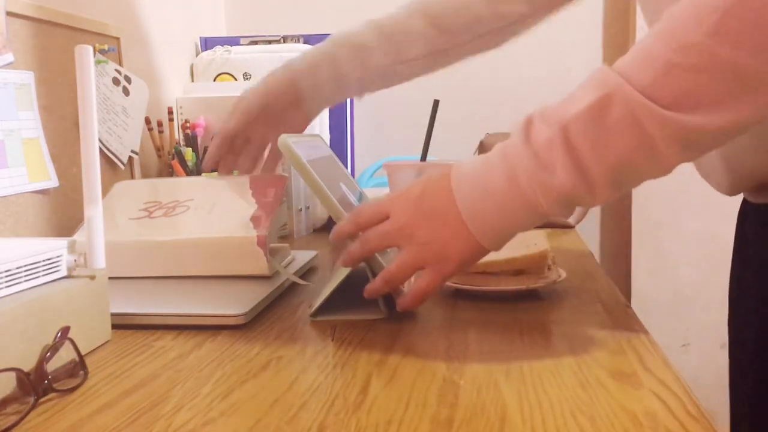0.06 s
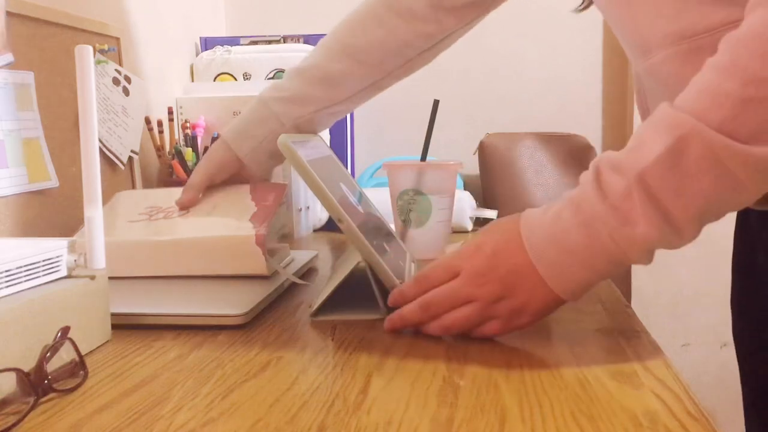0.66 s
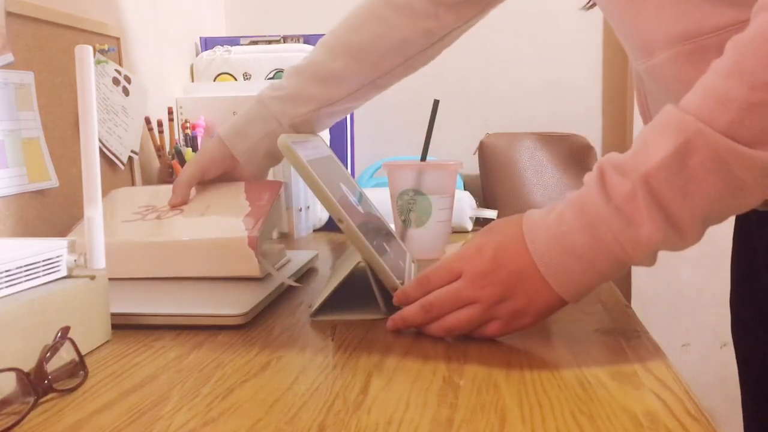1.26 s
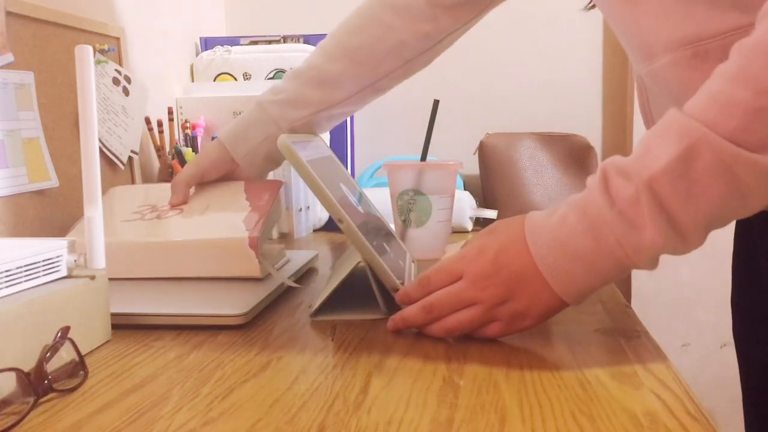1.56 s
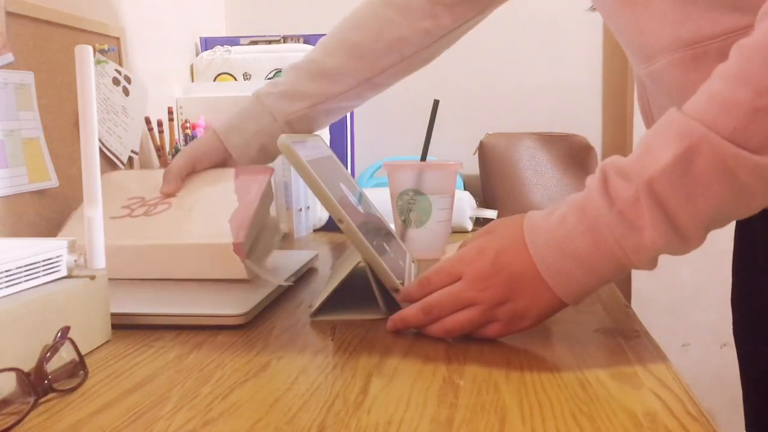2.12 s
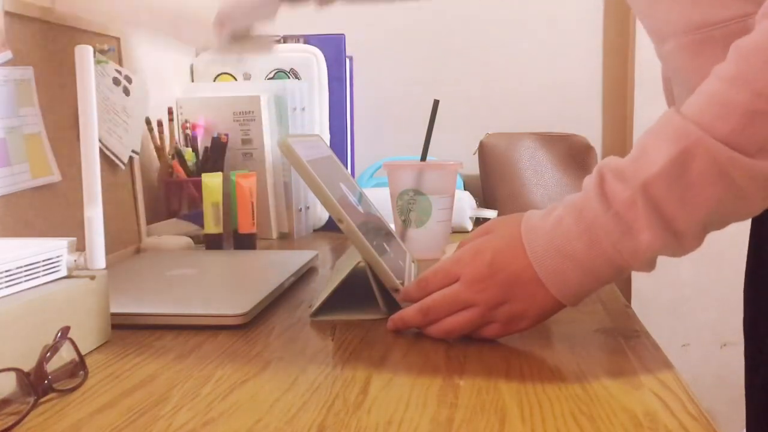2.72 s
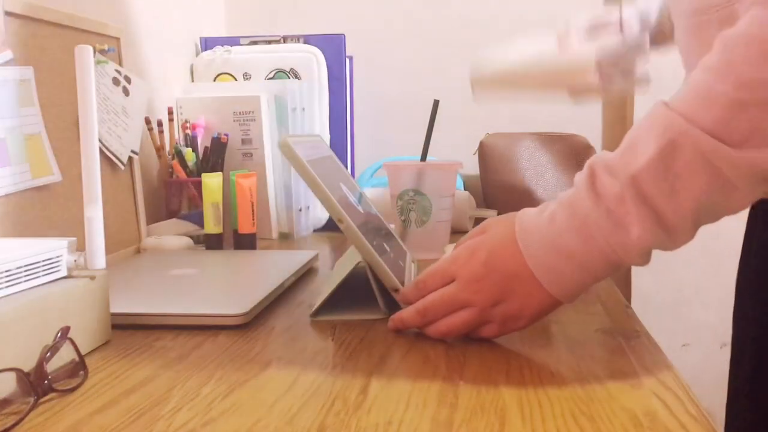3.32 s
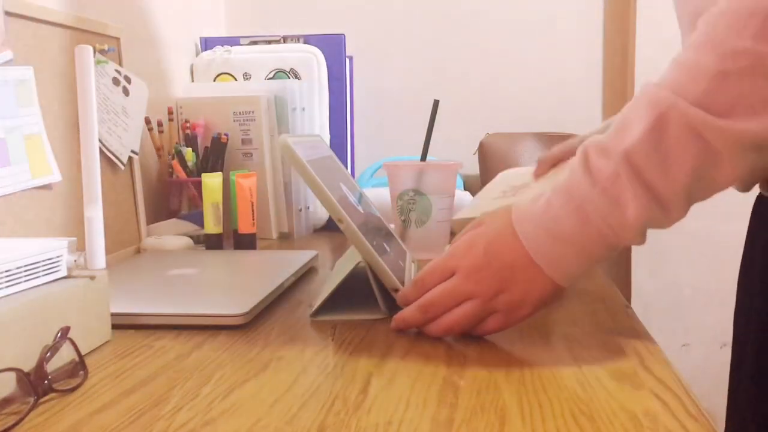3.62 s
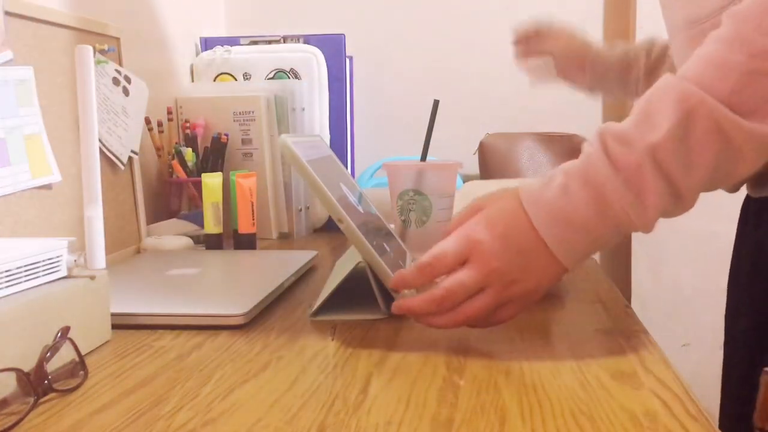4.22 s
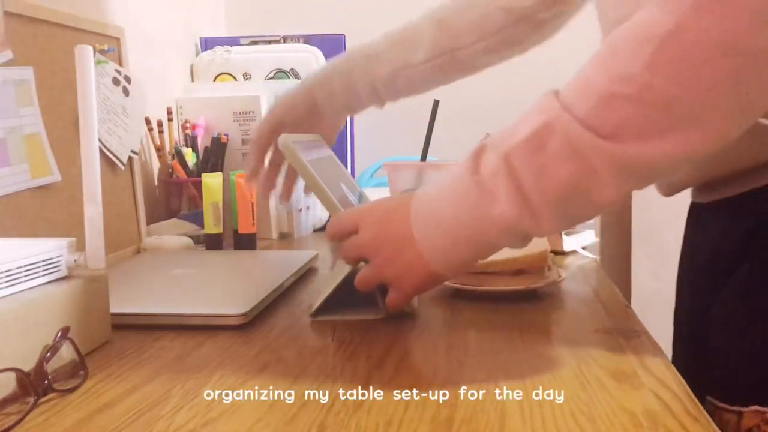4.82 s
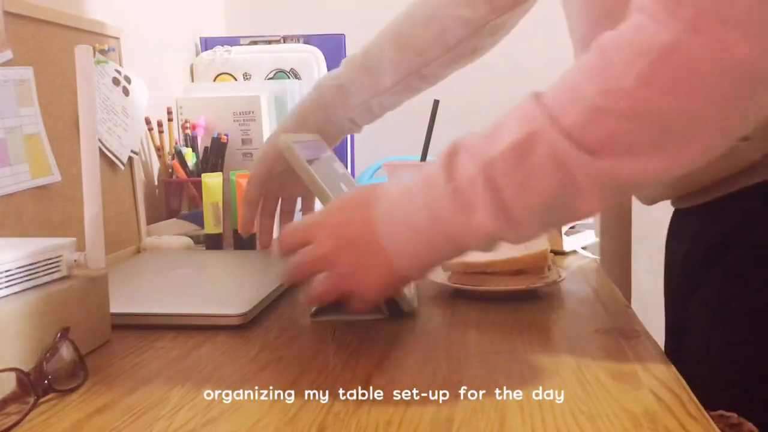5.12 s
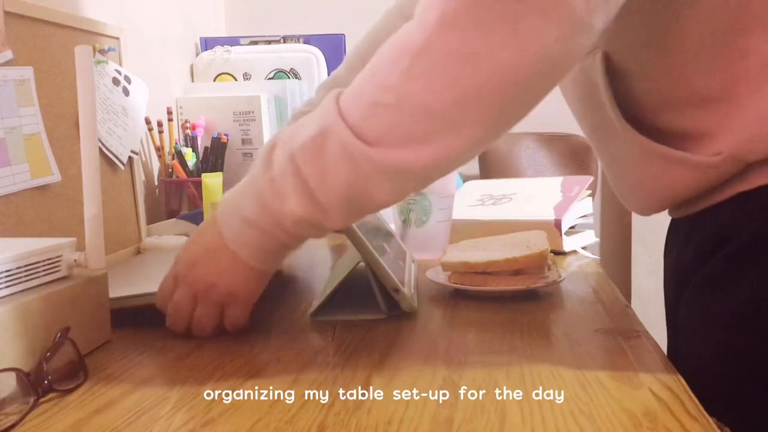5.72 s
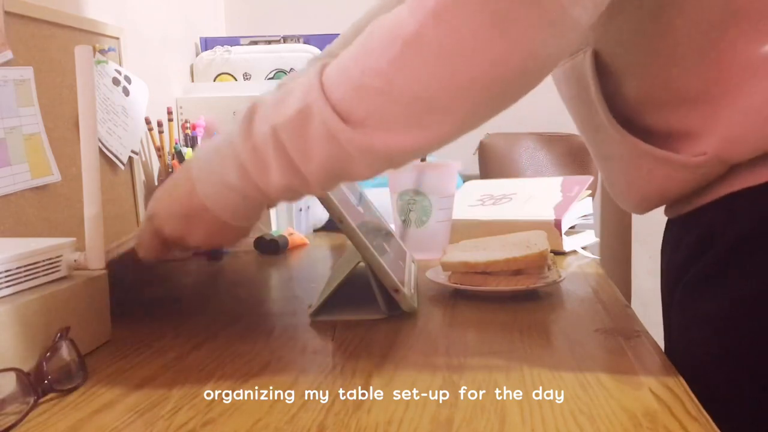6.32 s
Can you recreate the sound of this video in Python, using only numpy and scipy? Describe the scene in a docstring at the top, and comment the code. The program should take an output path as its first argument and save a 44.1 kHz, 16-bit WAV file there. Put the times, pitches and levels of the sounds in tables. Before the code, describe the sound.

In a small room with a steady low hum, fingernails click lightly on a tablet stand and a cardboard box, with faint brushing of card and sleeve. A faint whirr swells and fades as the box is set down in a few soft bumps. Then a laptop knocks hard twice on the wooden desk, rattles on its feet, judders and slides away. The contacts sound near, with a short room echo.

```python
"""A desk in a small humming room; ceiling and walls answer each blow.
First, fingers tap a tablet stand and a card box: nail click, hollow ring, echo. Card and sleeve brush.
From 2 s a faint whirr swells, fading after 4 s; at 3.5 s the box is set down in soft bumps.
At 5.1 s fingers grip a laptop. From 5.5 s it knocks hard twice on the wooden top, ringing desk and
case, rocks on its feet, judders in stick-slip and slides away."""
import sys
import numpy as np
from scipy import signal
from scipy.fft import rfft, irfft, next_fast_len
from scipy.io import wavfile

SR = 44100
rng = np.random.default_rng(int(sys.argv[2]) if len(sys.argv) > 2 else 0)


def log_audio(samples):
    """Write samples as a 16-bit WAV file to the path given in sys.argv[1]."""
    # one column per channel
    frames = np.atleast_2d(samples).T
    # limit to full scale, then quantise
    limited = np.clip(frames, -1, 1)
    pcm = np.round(limited * 32767).astype(np.int16)
    wavfile.write(sys.argv[1], SR, pcm)


N = 285327
TIME_S = np.arange(N) / SR
RING_S = TIME_S[:SR // 3]

# room noise spectrum: freq_hz, gain_db
ROOM_SPECTRUM = [(15, -49), (25, -2), (52, -2.5), (152, -2.5), (198, -0.5), (246, -4), (331, -11),
                 (368, -10), (567, -17), (648, -17.5), (919, -16.5), (1450, -25.5), (1750, -21.5),
                 (2560, -34), (15500, -54)]
# room noise contour: time_s, mid_db, treble_db
AIR_CONTOUR = [(0.0, -52, -67.5), (0.62, -54.5, -67.5), (1.01, -54.5, -69), (2.4, -53.5, -64.5),
               (4.65, -54.5, -63), (5.1, -52, -64.5)]
# room tones: pitch_hz, width_hz, start_db, slope_db_per_s
HUM_TONES = [(50, 5.8, -53.5, 0.47), (100.3, 8.7, -51, 0.08), (133.3, 35, -49.5, -8),
             (223.2, 27, -57.5, 1.58), (248.6, 8.2, -56.5, 1.35), (358.8, 26, -58, 0.56)]
# rumble swells: peak_s, sigma_s, pitch_hz, level_db
RUMBLE_SWELLS = [(1.62, 0.19, 64, -47), (2.94, 0.22, 100.5, -47), (3.46, 0.24, 65, -49.5),
                 (5.3, 0.44, 48.4, -53)]
# whirr noise bands: centre_hz, width_hz, gain_db
WHIRR_BANDS = [(768, 310, -4.5), (1640, 170, -25), (2700, 140, -54)]
# whirr tones: pitch_hz, wander_hz, gain_db
WHIRR_TONES = [(749.4, 27, -3.5), (795.3, 22, 4.5)]
# card and sleeve strokes: peak_s, rise_s, fall_s, level_db
BRUSH_STROKES = [(.17, 0.17, 0.29, -59), (.64, 0.077, 0.081, -64), (.86, 0.044, 0.014, -57),
                 (1.97, 0.084, 0.07, -57), (2.39, 0.0025, 0.016, -40.5), (2.4, 0.078, 0.06, -54),
                 (3.65, 0.025, 0.023, -55.5), (3.868, 0.09, 0.031, -51.5), (5.19, 0.032, 0.029, -44.5),
                 (6.4, 1, 0.32, -53)]
# brushing spectrum: freq_hz, gain_db
BRUSH_SPECTRUM = [(200, -5), (700, 20.5), (2000, 0.5), (4500, 0), (8500, -2.5), (12000, -4.5), (16000, -10)]
# box landings: start_s, level_db, contact_hz
BOX_BUMPS = [(3.51, -26.5, 280), (3.652, -27.5, 192), (3.728, -29, 200), (3.864, -31.5, 1600)]
# card box modes: pitch_hz, gain_db, t60_s
BOX_MODES = [(142, 3, 0.051), (213.6, 2, 0.16), (394, 0, 0.047), (584, 3.5, 0.04), (797, 12, 0.034),
             (896, 9, 0.03), (1245, 5, 0.022), (1490, -12, 0.028)]
# card wall crumple spectrum: freq_hz, gain_db
CRUMPLE_SPECTRUM = [(60, 6), (140, 2), (300, -3), (550, 1), (850, -7), (1350, -9), (2000, -9), (4000, -18),
                    (16000, -25)]
# hard edge click spectrum: freq_hz, gain_db
CLICK_SPECTRUM = [(300, 9), (1000, 9), (2000, 5), (3800, -0.5), (6200, -2.5), (9000, -5.5), (12000, -6),
                  (16000, -8)]
# finger taps: start_s, click_db, click_hz, ring_db, ring_hz, echo_gain_db
FINGER_TAPS = [(0.138, -39, 6820, -41.5, 1700, -18), (.159, -36.5, 6500, -47, 1700, -6),
               (.277, -18.5, 7550, -37.5, 754, 8), (0.5011, -18, 4400, -23.5, 778, 3.5),
               (0.6472, -25, 5900, -32, 750, -1), (0.7403, -25, 5100, -36, 830, 3.5),
               (0.795, -22, 2160, -39.5, 730, 5), (5.137, -35, 9000, -56, 900, -5),
               (5.166, -29.5, 8000, -30.5, 410, -2), (5.356, -25.5, 2780, -28, 1470, -14)]
# tapped object modes: pitch_ratio, gain_db, t60_s
TAP_MODES = [(1, 1, 0.02), (1.25, -4.5, 0.016), (1.62, -12, 0.013), (3.3, -20.5, 0.0093)]
# laptop feet juddering: start_s, end_s, level_db
JUDDERS = [(5.563, 5.623, -26), (5.663, 5.808, -27.5)]
# stick-slip spectrum: freq_hz, gain_db
JUDDER_SPECTRUM = [(100, -25), (250, -6), (500, 6.5), (700, 1.5), (1100, -4), (1600, -15), (2100, -23.5),
                   (4200, -28.5), (8000, -39), (16000, -40)]
# laptop gliding: start_s, end_s, level_db
SLIDES = [(5.642, 5.8, -45), (5.932, 6.391, -42)]
# glide rasp spectrum: freq_hz, gain_db
SLIDE_SPECTRUM = [(45, -1.5), (80, -19), (140, 0.5), (210, 7.5), (320, -23), (500, -22.5), (700, -6.5),
                  (1100, -20.5), (1600, -20.5), (3300, -32.5), (8500, -40.5), (11000, -67), (16000, -57)]
# laptop blows on the desk: start_s, body_db, contact_hz, tick_db
LAPTOP_KNOCKS = [(5.5108, 2.5, 3520, 5), (5.5893, -9.5, 780, -15), (5.6637, -8.5, 900, -26),
                 (5.6696, 2, 3020, -1), (5.677, -23, 1200, -26), (5.7077, -22, 900, -28),
                 (5.731, -6.5, 1500, -13.5), (5.739, -31, 1500, -17), (5.792, -10.5, 1500, -26),
                 (5.897, -17.5, 600, -31), (5.921, -24, 194, -59)]
# modes of the loaded desk top: pitch_hz, gain_db, t60_s
DESK_MODES = [(141, -3.5, 0.14), (232.2, -1, 0.17), (323, -4, 0.18), (379.4, -7, 0.13), (475, 1, 0.14),
              (590.5, -0.5, 0.11), (740, -14, 0.26), (878, -7, 0.14), (970, -4, 0.077), (1040, -11, 0.1),
              (1247, -0.5, 0.04), (1414, -8, 0.051), (1620, -10, 0.061), (1880, 1.5, 0.016),
              (2360, -28, 0.045), (2770, -34, 0.071)]
# metal case ring spectrum: freq_hz, gain_db
CASE_SPECTRUM = [(80, -20), (200, 15.5), (420, 18), (900, 9.5), (1300, 9), (1850, 6.5), (3000, 4),
                 (4200, 2.5), (6000, -4), (7800, -29), (10000, -11), (16000, -27)]
# standing waves at the microphone housing: centre_hz, width_hz, gain_db
HOUSING_BANDS = [(1480, 250, 4), (2710, 470, 4.5), (4430, 250, 2), (4940, 360, -4.5), (6400, 4200, 2.5),
                 (7740, 740, -2), (8900, 1800, 2.5), (10520, 480, -5)]


def undb(db):
    """Decibels to gain."""
    return 10 ** (np.asarray(db) / 20)


def unit(x):
    """Scale to rms 1."""
    return x / np.sqrt(np.mean(x ** 2))


def colour(x, spectrum):
    """Shape by (freq_hz, gain_db) points, rms 1."""
    hz, db = np.transpose(spectrum)
    size = next_fast_len(len(x), True)
    bins_hz = np.fft.rfftfreq(size, 1 / SR)
    gain = undb(np.interp(np.log(bins_hz + 1), np.log(hz), db))
    return unit(irfft(rfft(x, size) * gain, size)[:len(x)])


def noise(spectrum, size=N):
    """Coloured noise, rms 1."""
    return colour(rng.standard_normal(next_fast_len(size, True)), spectrum)[:size]


def cut(x, hz, kind, order=2):
    """Butterworth filter."""
    return signal.sosfilt(signal.butter(order, np.clip(hz, 10, SR / 2.1), kind, fs=SR, output="sos"), x)


def band(x, centre_hz, width_hz, order=1):
    """Bandpass by centre and width."""
    return cut(x, [centre_hz - width_hz / 2, centre_hz + width_hz / 2], "bandpass", order)


def resonance(hz, width_hz):
    """Resonance driven by turbulence, rms 1."""
    return unit(band(rng.standard_normal(N), hz, width_hz, order=2))


def waver(hz, wander_hz):
    """Even tone of wandering pitch, rms 1."""
    drift_hz = wander_hz / 2 * unit(cut(rng.standard_normal(N), wander_hz, "lowpass"))
    return unit(np.sin(2 * np.pi * np.cumsum(hz + drift_hz) / SR))


def fade(t60_s):
    """Exponential decay."""
    return np.exp(-np.log(1000) * RING_S / t60_s)


def swell(start_s, end_s, attack_s, release_s, slope_db_per_s=0):
    """Attack before start, sloping hold, release after end."""
    attack = np.exp(-np.maximum(start_s - TIME_S, 0) / attack_s)
    release = np.exp(-np.maximum(TIME_S - end_s, 0) / release_s)
    return attack * release * undb(slope_db_per_s * (np.clip(TIME_S, start_s, end_s) - start_s))


def modes(table):
    """Ring of a struck object; neighbouring modes alternate in sign."""
    return sum((-1) ** k * undb(db) * fade(t60_s) * np.sin(2 * np.pi * hz * RING_S)
               for k, (hz, db, t60_s) in enumerate(table))


def grains(rate_per_s, spread_db):
    """Random friction slips of uneven size."""
    slips = (rng.random(N) < rate_per_s / SR) * rng.standard_normal(N)
    return slips * undb(spread_db * np.minimum(rng.exponential(size=N), np.pi))


def click(t60_s, rise_s=0.0012):
    """Brief crack of a hard edge."""
    return noise(CLICK_SPECTRUM, len(RING_S)) * fade(t60_s) * (1 - np.exp(-RING_S / rise_s))


def add(track, start_s, sound):
    """Mix a sound in at start_s."""
    start = int(start_s * SR)
    track[start:start + len(sound)] += sound[:N - start]


def room(x, wet_db, echo_s=0.0075, echo_db=-12):
    """Direct sound, one reflection and a short diffuse tail, different for each contact."""
    onset = 1 - np.exp(-(RING_S / 0.016) ** 2)
    low = unit(onset * rng.standard_normal(len(RING_S)) * fade(t60_s=0.2))
    high = unit(onset * rng.standard_normal(len(RING_S)) * fade(t60_s=0.14))
    tail = undb(-8) * cut(low, 1250, "lowpass") + undb(-6) * cut(high, [1200, 9000], "bandpass", order=1)
    response = tail / np.sqrt(len(RING_S))
    response[int(echo_s * SR)] += undb(echo_db)
    return x + undb(wet_db) * signal.fftconvolve(x, response)[:len(x)]


def background(rumble_db=-46, rise_db_per_s=1, mid_trim_db=2, treble_trim_db=0.8):
    """Room rumble, air and hiss, with a wavering hum and a few deep swells."""
    time_s, mid_db, treble_db = np.transpose(AIR_CONTOUR)
    rumble = unit(cut(noise(ROOM_SPECTRUM), 448, "lowpass", order=4))
    air = unit(cut(noise(ROOM_SPECTRUM), [450, 3500], "bandpass", order=4))
    hiss = unit(cut(noise(ROOM_SPECTRUM), 2940, "highpass", order=4))
    floor = undb(rumble_db + rise_db_per_s * TIME_S) * rumble
    floor += undb(mid_trim_db + np.interp(TIME_S, time_s, mid_db)) * air
    floor += undb(treble_trim_db + np.interp(TIME_S, time_s, treble_db)) * hiss
    hum = sum(undb(db + slope_db_per_s * TIME_S) * resonance(hz, width_hz)
              for hz, width_hz, db, slope_db_per_s in HUM_TONES)
    deep = sum(undb(db) * resonance(hz, width_hz=12) * np.exp(-((TIME_S - peak_s) / sigma_s) ** 2 / 2)
               for peak_s, sigma_s, hz, db in RUMBLE_SWELLS)
    return room(floor, wet_db=-5) + hum + deep


def distant_whirr(start_s=2.02, end_s=4, level_db=-48, start_hz=682, rise_hz_per_s=15, reach_hz=75):
    """Rushing bands swell and fade; two tones gain as a rising drive frequency nears them."""
    drive_hz = start_hz + rise_hz_per_s * (TIME_S - start_s)
    rush = sum(undb(db) * resonance(hz, width_hz) for hz, width_hz, db in WHIRR_BANDS)
    tones = sum(undb(db) * waver(hz, wander_hz) / (1 + ((hz - drive_hz) / reach_hz) ** 2)
                for hz, wander_hz, db in WHIRR_TONES)
    return undb(level_db) * swell(start_s, end_s, attack_s=0.27, release_s=0.78) * (rush + tones)


def brushes():
    """Card and cloth rub in grainy strokes."""
    strokes = sum(undb(db) * swell(peak_s, peak_s, rise_s, fall_s)
                  for peak_s, rise_s, fall_s, db in BRUSH_STROKES)
    return strokes * colour(grains(rate_per_s=11000, spread_db=2.5), BRUSH_SPECTRUM)


def box_bumps(base_lag_s=0.00633, base_cutoff_ratio=0.33, crumple_db=3):
    """The card box lands edge first, then duller on its base; its walls ring and crumple."""
    out = np.zeros(N)
    for start_s, db, contact_hz in BOX_BUMPS:
        for lag_s, cutoff_hz in [(0, contact_hz), (base_lag_s, contact_hz * base_cutoff_ratio)]:
            crumple = undb(crumple_db) * noise(CRUMPLE_SPECTRUM, len(RING_S)) * fade(t60_s=0.04)
            bump = undb(db) * cut(modes(BOX_MODES) + crumple, cutoff_hz, "lowpass")
            add(out, start_s + lag_s, room(bump, wet_db=1.5))
    return out


def finger_taps(echo_lag_s=0.008, echo_click_db=-19, echo_cutoff_hz=3500):
    """A nail clicks and rings the hollow object; a duller echo follows off a nearby surface."""
    out = np.zeros(N)
    for start_s, click_db, click_hz, ring_db, ring_hz, echo_gain_db in FINGER_TAPS:
        nail = undb(click_db) * cut(click(t60_s=0.013), [click_hz / 2, click_hz * 2], "bandpass", order=1)
        hollow = undb(ring_db) * modes([(ratio * ring_hz, db, t60_s) for ratio, db, t60_s in TAP_MODES])
        echo = undb(echo_click_db) * cut(nail, echo_cutoff_hz, "lowpass") + hollow
        add(out, start_s, room(nail + hollow, wet_db=-1.5))
        add(out, start_s + echo_lag_s, room(undb(echo_gain_db) * echo, wet_db=-4))
    return out


def laptop_drag(bounce_s=0.0019, bounce_db=-9, scrape_db=-26):
    """The feet stick and slip on wood, then glide with a soft rasp while the rim scrapes."""
    judder = sum(undb(db) * swell(start_s, end_s, attack_s=0.01, release_s=0.0069, slope_db_per_s=-20)
                 for start_s, end_s, db in JUDDERS)
    slide = sum(undb(db) * swell(start_s, end_s, attack_s=0.031, release_s=0.091, slope_db_per_s=7.5)
                for start_s, end_s, db in SLIDES)
    slips = colour(grains(rate_per_s=2400, spread_db=2.5), JUDDER_SPECTRUM)
    rasp = colour(grains(rate_per_s=3400, spread_db=3), SLIDE_SPECTRUM)
    scrape = unit(band(grains(rate_per_s=630, spread_db=4), centre_hz=1690, width_hz=820))
    hollow_rasp = unit(rasp + undb(bounce_db) * np.roll(rasp, int(bounce_s * SR)))  # desk reflection
    return judder * slips + slide * (hollow_rasp + undb(scrape_db) * scrape)


def laptop_blow(body_db, contact_hz, tick_db, desk_db=-18.5, case_db=-13, tick_trim_db=-13, seat_s=0.00037):
    """A foot seats with a tick, ringing desk and case; softer contact dulls the ring."""
    case = noise(CASE_SPECTRUM, len(RING_S)) * fade(t60_s=0.036)
    ring = undb(desk_db) * modes(DESK_MODES) + undb(case_db) * case
    body = cut(ring, contact_hz, "lowpass", order=1) * (1 - np.exp(-RING_S / seat_s))
    tick = cut(click(t60_s=0.024), 7900, "lowpass", order=1)
    return room(undb(body_db) * body + undb(tick_db + tick_trim_db) * tick, wet_db=-2)


def laptop_knocks(settle_lag_s=0.0027, rock_start_s=5.5625, rock_period_s=0.0135, rock_loss_db=5):
    """The laptop drops on an edge, its weight thumps after; it rocks foot to foot and knocks again."""
    out = np.zeros(N)
    for start_s, body_db, contact_hz, tick_db in LAPTOP_KNOCKS:
        add(out, start_s, laptop_blow(body_db, contact_hz, tick_db))
    thump = laptop_blow(body_db=3, contact_hz=576, tick_db=-7.5)
    add(out, LAPTOP_KNOCKS[0][0] + settle_lag_s, thump)
    for k in range(5):
        body_db = -4 - k * rock_loss_db
        touch = laptop_blow(body_db, contact_hz=776, tick_db=body_db - 12)
        add(out, rock_start_s + k * rock_period_s, touch)
    return out


def scene():
    """Desk handling over the room background, mono."""
    rubbing = room(laptop_drag() + brushes(), wet_db=-1.5)
    return (laptop_knocks() + finger_taps() + box_bumps() + rubbing + background() + distant_whirr())[None]


def record(dry, low_cut_hz=49.3, high_cut_hz=15800):
    """Microphone: hollow housing colour, no deep bass, no extreme top."""
    x = cut(dry, low_cut_hz, "highpass", order=4)
    for hz, width_hz, db in HOUSING_BANDS:
        x = x + (undb(db) - 1) * band(x, hz, width_hz)
    return signal.sosfilt(signal.ellip(10, .2, 70, high_cut_hz, fs=SR, output="sos"), x)


dry = scene()
out = record(dry)
log_audio(out)
```